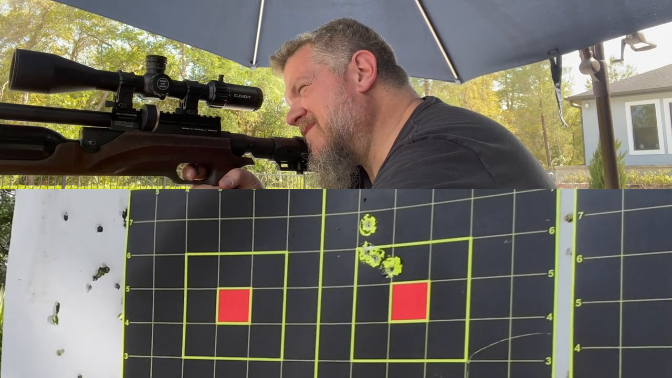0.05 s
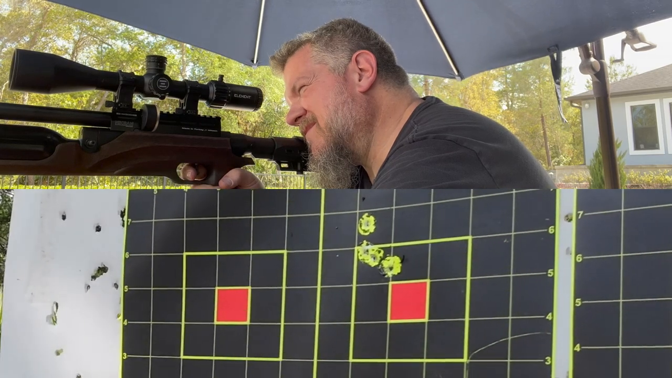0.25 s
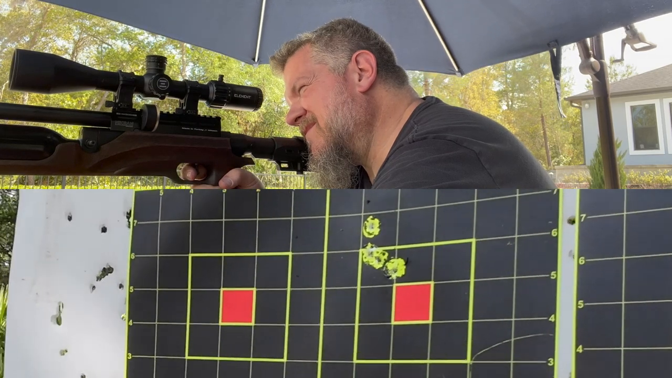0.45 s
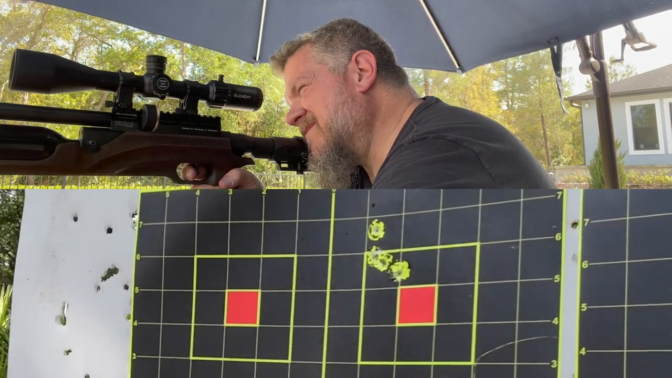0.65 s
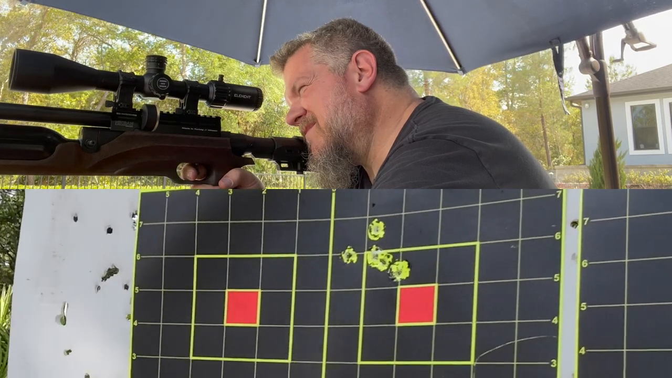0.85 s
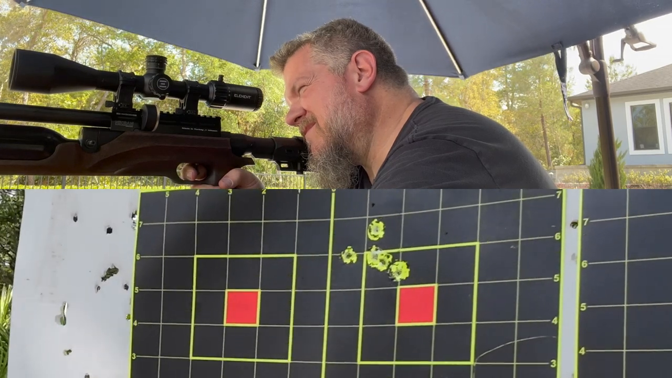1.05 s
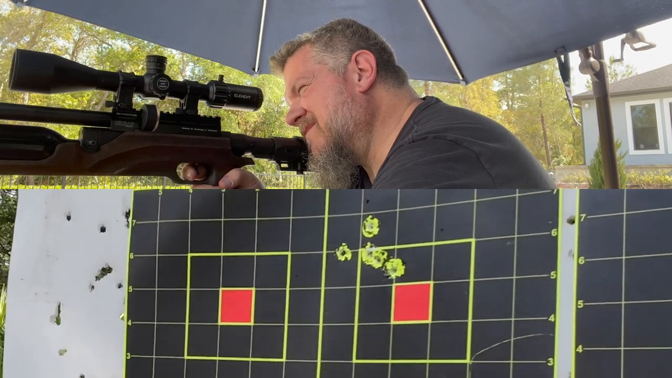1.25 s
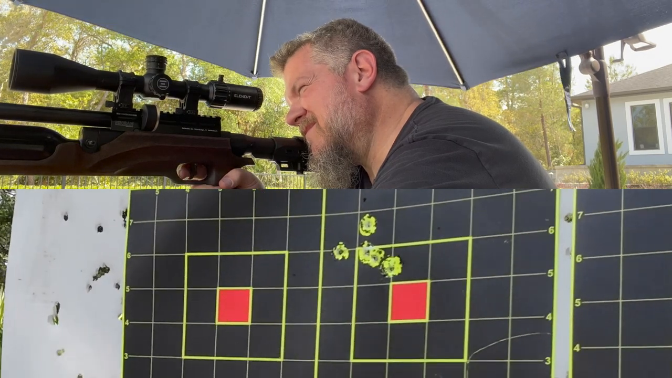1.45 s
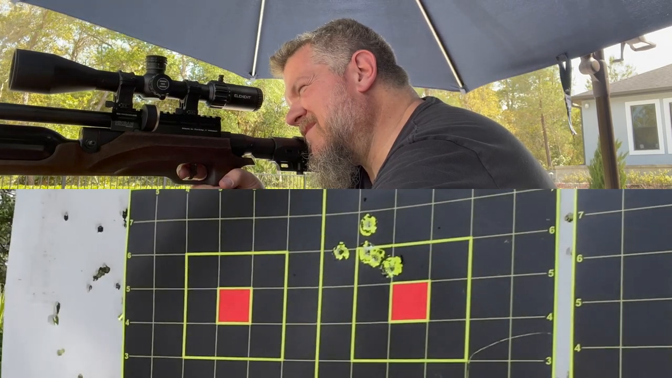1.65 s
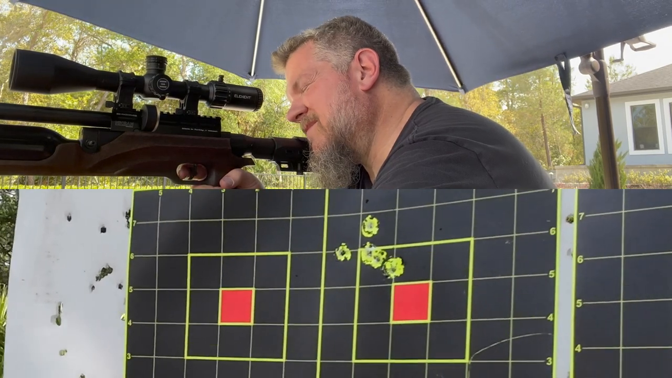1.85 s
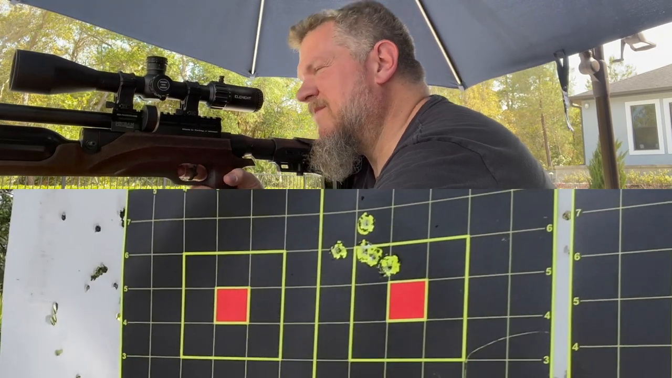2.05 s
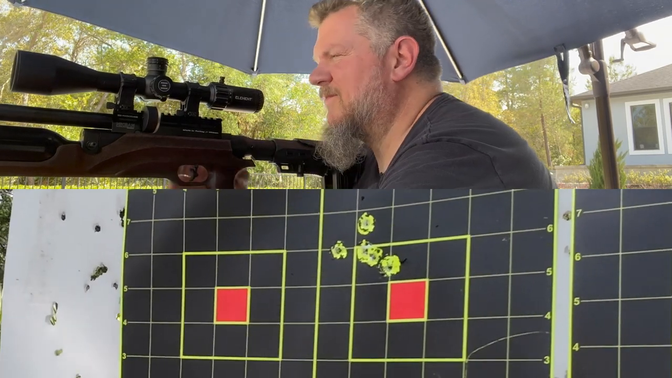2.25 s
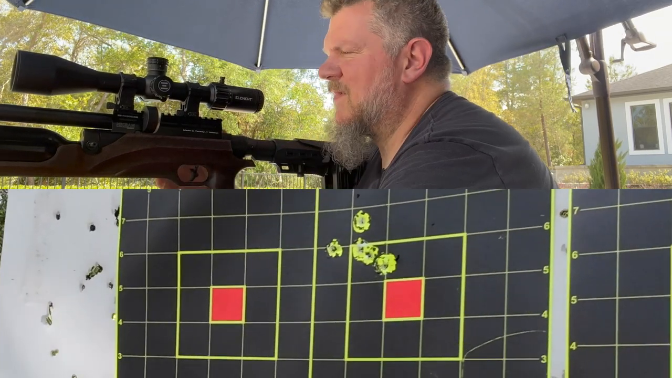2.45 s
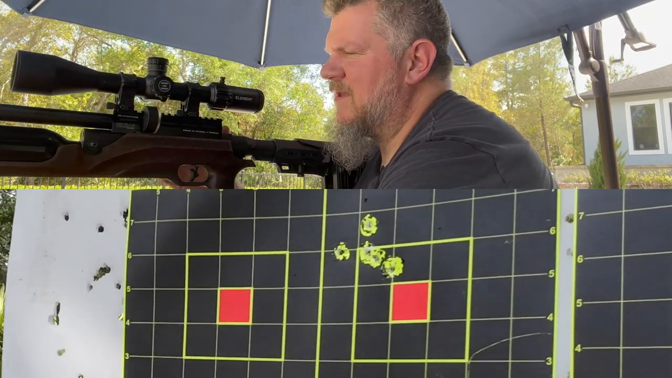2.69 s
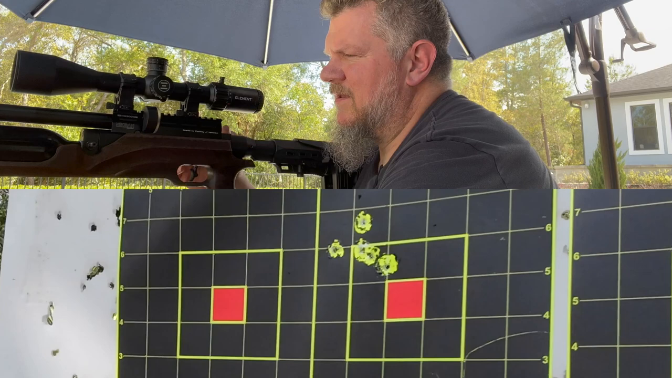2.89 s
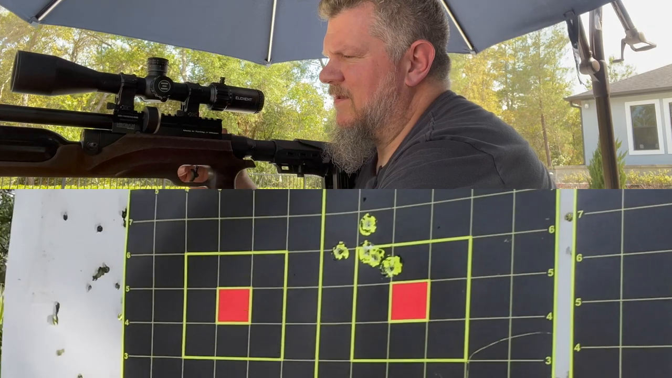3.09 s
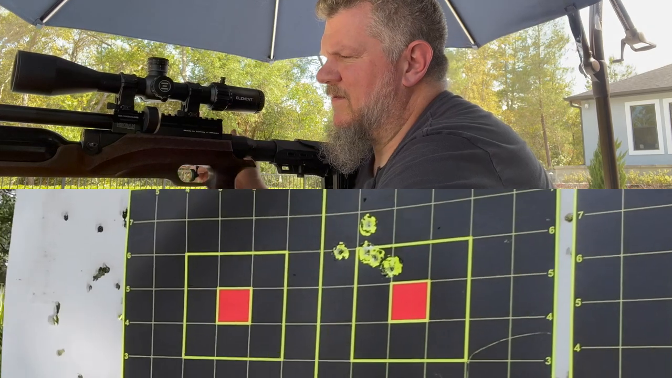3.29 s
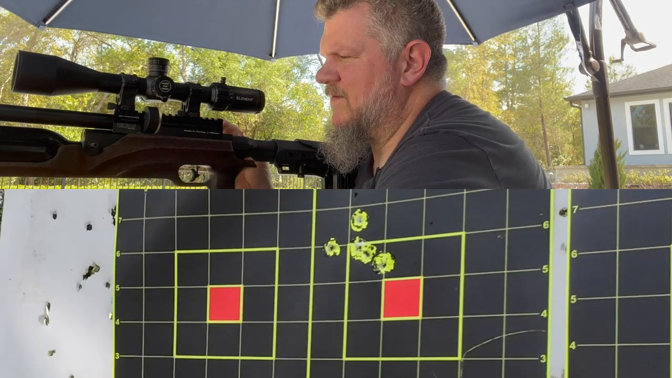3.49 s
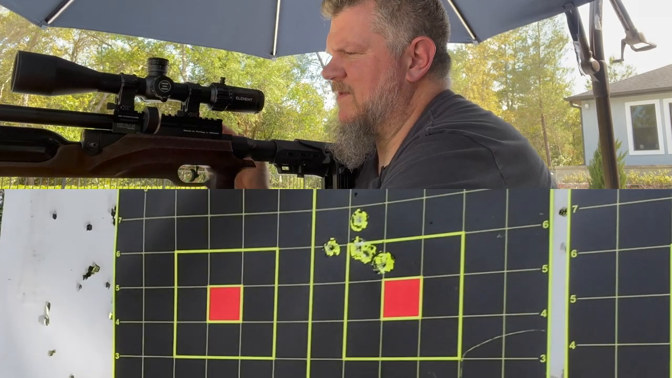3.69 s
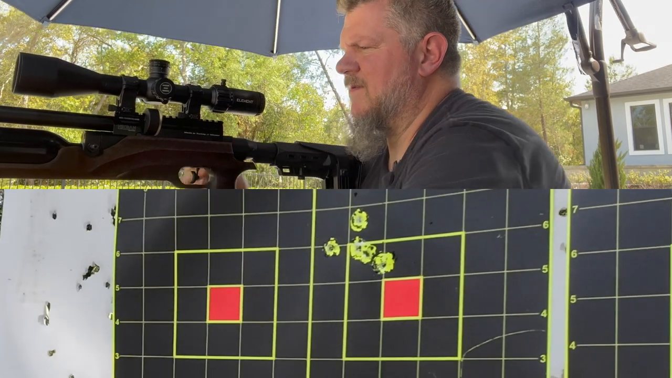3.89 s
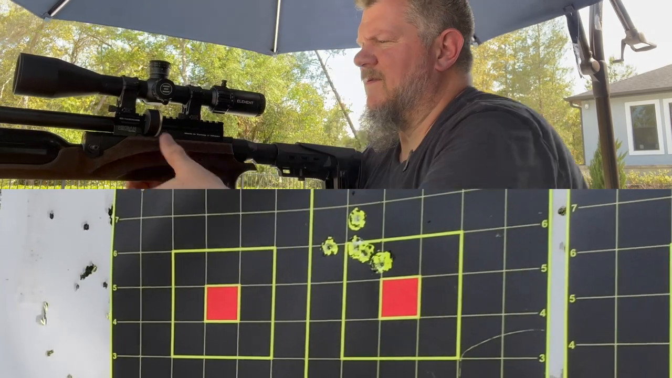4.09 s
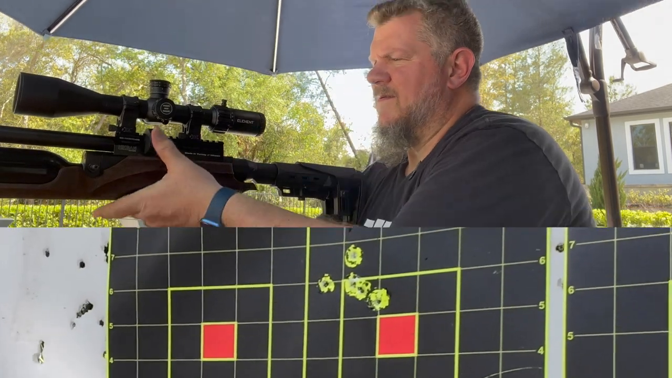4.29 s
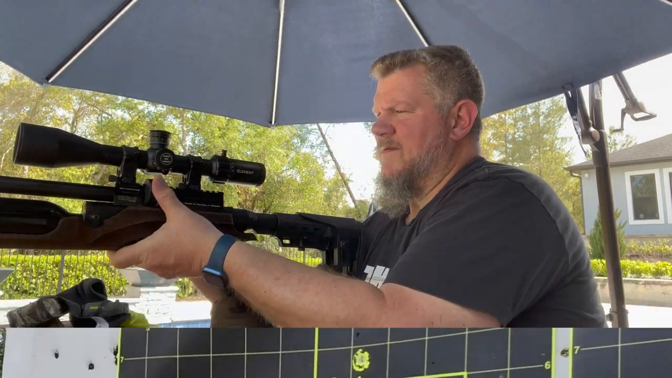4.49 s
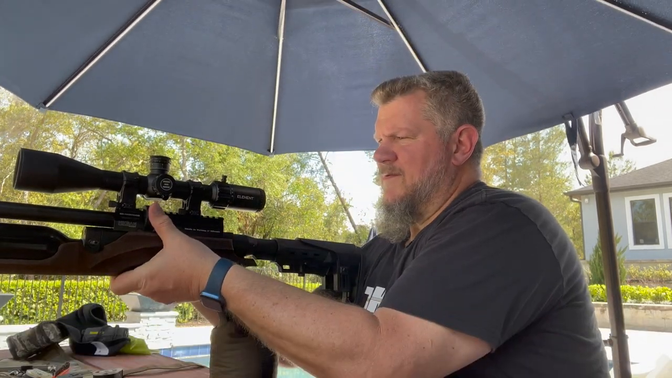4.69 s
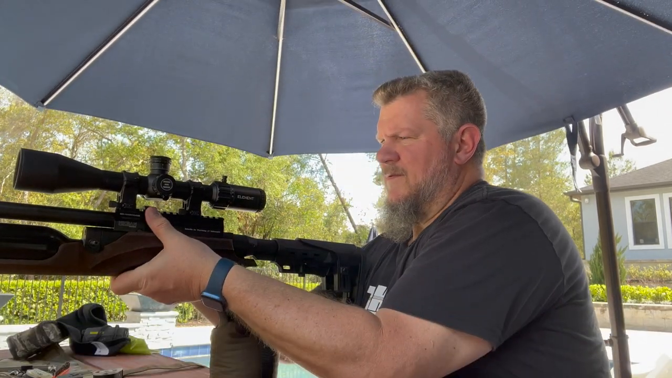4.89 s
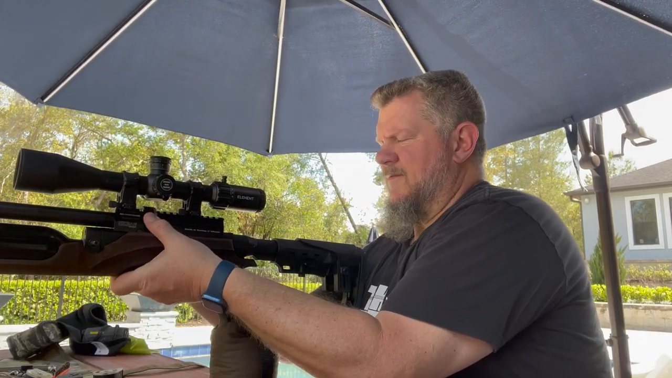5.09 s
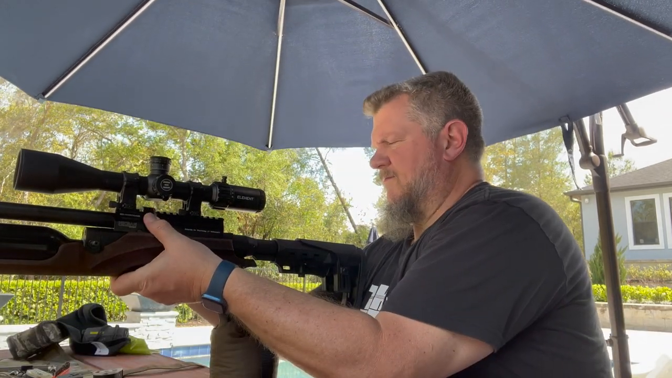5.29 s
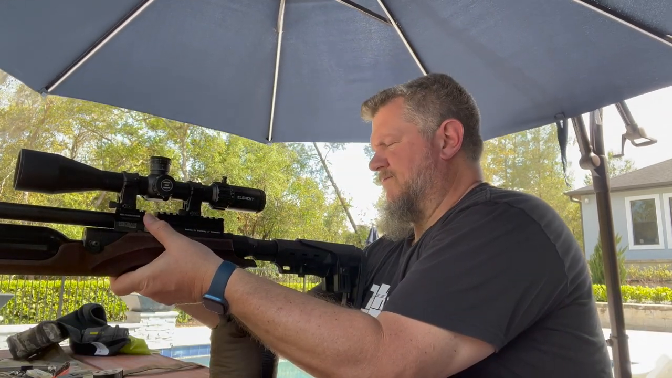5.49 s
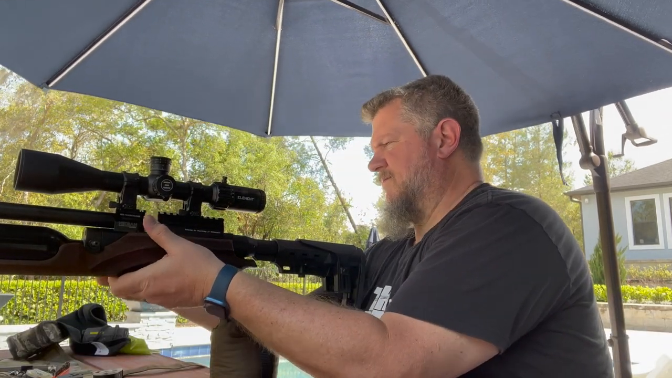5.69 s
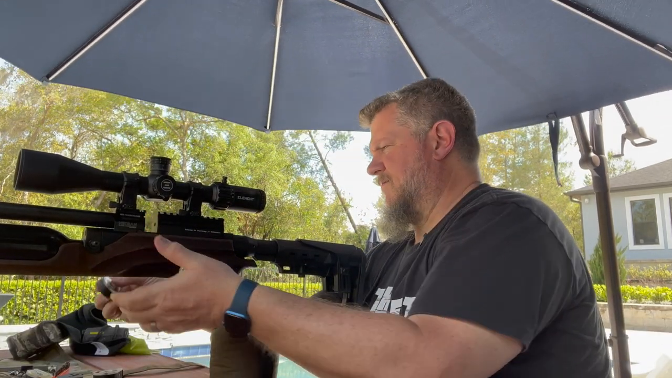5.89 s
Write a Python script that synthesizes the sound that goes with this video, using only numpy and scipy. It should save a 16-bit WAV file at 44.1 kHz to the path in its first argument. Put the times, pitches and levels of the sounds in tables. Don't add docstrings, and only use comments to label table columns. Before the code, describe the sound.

Outdoors in a garden, low breeze rumble, far traffic and a faint engine hum run throughout. At 0.8 s a tiny metallic tick leads instantly into an air rifle's loud, hissing crack, about a tenth of a second long, so close that the microphone overloads. Short echoes come off walls and trees while the air cylinder rings thinly. At 1.05 s the pellet smacks a board, crisp and bright; tiny chips tick down between 1.2 and 1.8 s. Near 2.1 s cloth or skin slides softly, then small clicks and scrapes at 2.4-2.6 s. A rattling clack comes at 2.7 s, another at 2.9 s, and firm lever snaps at 3.2-3.4 s, the last bright and ringing. Woody taps follow to 4.1 s, then a quieter gap with a faint rail slide. Rattles at 4.6 s, a sharp click at 4.9 s, light taps, and hollow knocks at 5.45, 5.74 and 5.82 s.

```python
import sys
import numpy as np
from scipy import signal
from scipy.fft import rfft, irfft, next_fast_len
from scipy.io import wavfile
from scipy.ndimage import uniform_filter1d, map_coordinates

SR = 44100
rng = np.random.default_rng(int(sys.argv[2]) if len(sys.argv) > 2 else 0)


def volts_from_decibels(level):
    exponent = np.asarray(level, float) / 20
    return 10 ** exponent


def master_out(mix):
    frames = np.transpose(np.atleast_2d(mix))
    ceiling = np.clip(frames, -1, 1)
    pcm = np.round(ceiling * 32767).astype(np.int16)
    wavfile.write(sys.argv[1], SR, pcm)


N = 262215

# start in seconds, level in dB, rise in seconds, t60 in seconds.
BLAST_STAGES = [
    (0.8078, -4.5, .0003, 0.04),
    (0.8148, -6.5, .001, 0.0049),
    (0.8177, -10, .003, 0.17),
    (0.8239, -10.5, .002, 0.029),
    (0.832, -8, 0.0022, 0.077),
    (.842, -16.5, .003, 0.063),
    (0.849, -14, .002, 0.06),
    (.864, -16.5, 0.0028, 0.02),
]
# frequency in Hz, level in dB per Hz.
JET_COLOUR = [(50, -35.5), (130, -.5), (185, 1.5), (260, -4), (400, 0), (700, -2), (1300, -6), (2200, -4.5),
              (4500, -2.5), (6500, -1.5), (8500, -9.5), (13000, -9.5), (16000, -12), (17000, -43)]
# frequency in Hz, width in Hz, level in dB.
SHROUD_MODES = [(700, 16, 3.5), (4200, 630, -5), (4900, 270, -6)]
# frequency in Hz, gain in dB.
FADING_JET_COLOUR = [(120, -12), (230, -11), (380, 3), (700, 1), (1200, -3), (1800, 3), (2800, 0),
                     (7000, 0), (10000, -4), (14000, -8)]
# start in seconds, level in dB, pitch in Hz, t60 in seconds.
HAMMER_PINGS = [
    (0.8035, -18, 4660, 0.019),
    (0.8038, -25, 899.5, .02),
    (0.8052, -24.5, 6000, .01),
    (0.815, -9, 11420, 0.008),
]
# start in seconds, level in dB, pitch in Hz, t60 in seconds.
CYLINDER_RING = (.81, -44.3, 1484, 1.98)
# start in seconds, level in dB, rise in seconds,
# t60 in seconds, pitch in Hz, width in Hz.
WHISTLE_TONES = [(.8085, -13.5, .001, .04, 6600, 500), (.8105, -14, .001, .03, 2706, 600),
                 (.819, -16.5, .002, .05, 4300, 400.7), (.823, -18, .002, .04, 12800, 2502),
                 (.824, -20, .001, .03, 9700, 600), (.829, -14, .002, .08, 4300, 600),
                 (.845, -22, .001, .03, 8910, 700), (.842, -18, .003, .07, 4700, 800),
                 (.86, -26, .002, .03, 600, 400), (.852, -23, .004, .06, 380, 200)]
# start in
# seconds, end in seconds, level in dB, centre in Hz, fade in dB.
WALL_RETURNS = [
    (0.896, .93, -42, 5800, 0),
    (.92, .96, -54, 1300, 3),
    (0.929, 0.955, -44, 5000, 0),
    (1.05, 1.2, -59, 12000, 36),
]

# frequency in Hz, t60 in seconds.
YARD_T60 = [(100, 0.16), (500, 0.3), (1200, 0.49), (3000, 0.4), (6000, 0.57), (8000, .52), (10000, .39),
            (15000, 0.22)]
# frequency in Hz, t60 in seconds.
TREES_T60 = [(200, 0.35), (1500, 1.54), (5000, 0.93), (8000, .7), (12000, 0.28)]
# frequency in Hz, t60 in seconds.
FENCE_T60 = [(500, .1), (3000, .15), (6000, .22), (10000, .38), (15000, .38)]

# time in seconds, peak in dB, centre in Hz, width in Hz.
PELLET_HITS = [
    (1.051, -13, 6360, 5040),
    (1.0524, -46, 5200, 2990),
    (1.0585, -39, 2750, 900),
]
# time in seconds, peak in dB, centre in Hz, width in Hz.
FALLING_CHIPS = [
    (1.21, -54, 2036, 504),
    (1.294, -55, 7040, 2500),
    (1.358, -62, 3500, 2480),
    (1.465, -55, 2480, 900),
    (1.4796, -49, 6100, 898),
    (1.8, -61, 9780, 3980),
]
# time in seconds, peak in dB, centre in Hz,
# width in Hz.
DRY_TICKS = [(1.051, -34, 2200, 2000), (1.051, -40, 15000, 3000), (1.4797, -57, 7600, 900),
             (1.48, -58, 3800, 1500), (1.48, -66, 13000, 1500), (2.4495, -57, 11000, 4000),
             (2.468, -62, 9000, 5000), (2.476, -46, 11400, 3000), (2.476, -51, 5300, 1500),
             (2.494, -54, 8500, 3000), (2.5545, -51, 4500, 4000), (2.5545, -62, 10500, 1500),
             (2.571, -67, 12500, 4000), (2.5795, -58, 6000, 5000), (2.625, -65, 12000, 5000),
             (2.737, -45, 13200, 2000), (3.364, -37, 12500, 3000), (3.3637, -29, 6200, 2000),
             (3.5715, -55, 6500, 5000), (4.804, -58, 9000, 8000), (4.8868, -25, 13000, 6000),
             (4.8875, -38, 9000, 3000), (5.455, -45, 7400, 2000), (5.455, -41, 5300, 1500),
             (1.051, -19, 9500, 3000), (3.2205, -45, 5500, 4000), (3.2785, -57, 11500, 2000),
             (4.405, -66, 5300, 2000), (4.38, -70, 4400, 1200), (5.461, -58, 12000, 5000),
             (5.537, -53, 6500, 4000), (5.744, -53, 11200, 1500), (5.7445, -44, 5000, 7000),
             (5.7402, -39, 3800, 3000), (5.822, -56, 6500, 5000)]

# time in seconds, peak in dB, pitch in Hz, bright tick in dB.
STEEL_CLICKS = [(2.433, -58.5, 2850, -7), (3.121, -57.5, 1590, -19.5), (5.216, -66, 2530, -20),
                (2.449, -61, 2760, 0), (2.478, -62, 3820, 3), (2.493, -61, 3800, -3),
                (2.8375, -49.5, 1900, -36), (3.4047, -25.5, 3800, -5), (4.875, -53.5, 1700, -7),
                (5.0467, -64.5, 3300, -22), (5.0587, -57, 1440, -20), (5.169, -56, 1880, -10),
                (5.4107, -46.5, 1846, -30)]
# time in seconds, peak in dB, pitch in Hz, bright tick in dB.
STOCK_TAPS = [(2.1799, -52, 3600, -4), (2.2258, -45, 1700, -19), (2.5786, -63.5, 1630, -20.5),
              (3.026, -58.5, 2865, -2), (3.2196, -39.5, 2020, -12), (3.4844, -55, 2020, -9),
              (3.4945, -39.5, 1990, -16), (3.5705, -45, 1680, -24), (3.611, -55, 3500, -12),
              (3.746, -43.5, 1900, -29), (3.8214, -45, 1500, -13), (3.9905, -50, 1520, -16),
              (4.0286, -59, 1536, -23.5), (4.1103, -68, 1560, -11), (4.404, -75, 2350, -17),
              (5.0085, -57, 1720, -6), (5.1016, -60, 1290, -25.5), (5.1846, -64, 1890, -23),
              (5.3634, -51, 1910, -31.5), (5.5363, -52, 1280, -18)]
# time in seconds, peak in dB, pitch in Hz, bright tick in dB.
STOCK_KNOCKS = [(2.5534, -52, 4230, -22), (3.8596, -39.5, 1940, -17), (5.7385, -41.5, 1900, -10),
                (5.816, -46, 1100, -14)]
# time in seconds, peak in dB, pitch in Hz, bright tick in dB.
LOOSE_RATTLES = [(2.7332, -30.5, 4100, -22), (2.9272, -36, 4000, -12), (4.6113, -43, 2246, -2),
                 (4.6278, -44.5, 2560, -12), (4.8, -48.5, 1600, -5), (4.9689, -49.5, 1660, 0),
                 (5.1581, -53.5, 1830, -6.5), (5.4283, -46, 1150, -36), (5.4521, -43, 1600, -24)]
# time in seconds, peak in dB, pitch in Hz, bright tick in dB.
LEVER_LATCHES = [(2.735, -32, 4750, -13), (3.2777, -35, 3800, -34), (3.3636, -33, 2190, -28),
                 (3.366, -34, 3950, -30), (4.8865, -35.5, 3300, -0.5)]
# frequency in Hz, width in Hz, level in dB.
ACTION_MODES = [(1440, 340, 1.5), (2270, 1650, -3), (2750, 170, 4.5), (3500, 3400, -3.5), (4200, 910, 5.5),
                (4900, 1600, 0), (6370, 250, -46)]
# frequency in Hz, width in Hz, level in dB.
STOCK_MODES = [(405, 360, -6.5), (758, 203, 6), (1155, 260, 2.5)]
# start in
# seconds, level in dB, pitch in Hz, t60 in seconds.
CONTACT_RINGS = [(2.738, -61, 4200, 0.12), (3.2773, -26, 4130, 0.018), (3.366, -20.5, 4150, 0.017),
                 (2.7355, -24, 4900, 0.018), (2.7305, -46, 3900, .03), (2.7372, -35, 2500, .016),
                 (2.7368, -32, 1600, .02), (3.359, -42, 1800, .03), (3.363, -27, 2050, 0.016),
                 (3.3639, -31, 1290, .015), (3.4045, -27, 10840, .011), (3.405, -27.5, 7600, .014),
                 (3.406, -31, 1950, .018), (3.4055, -40, 15300, .01), (3.405, -34, 4900, .015),
                 (3.407, -60, 8630, .1), (3.4045, -36, 12300, .012), (3.405, -51, 5860, 0.13),
                 (3.406, -53, 3810, 0.054), (3.406, -58, 2750, .15), (4.801, -47, 1550, 0.04),
                 (4.886, -43, 1600, .03), (4.887, -50, 1200, .08), (5.159, -57, 1200, .08),
                 (5.058, -39, 1350, 0.016), (5.4512, -33, 1616, 0.035),
                 (2.227, -55, 2500, .03), (2.838, -54, 4000, .02), (2.554, -56, 4250, .025),
              (2.554, -60, 1450, .03), (3.279, -44, 1500, .025), (2.93, -60, 3000, .1),
              (3.572, -54, 2000, .03), (3.746, -50, 4900, .02), (3.747, -46, 2300, .03),
              (3.76, -52, 750, .06), (3.861, -42, 1100, .035), (3.861, -46, 1840, .035),
              (3.861, -50, 5200, .02), (3.99, -56, 5200, .025), (3.991, -54, 1500, .04),
              (4.613, -50, 4840, .03), (4.969, -55, 3600, .03), (4.974, -56, 2750, .04),
              (4.972, -55, 1650, .04), (5.047, -62, 3300, .025), (5.06, -57, 2750, .03),
              (5.16, -58, 3300, .03), (5.168, -55, 2800, .035), (5.183, -57, 2750, .04),
              (5.183, -58, 1880, .04), (5.364, -52, 2500, .03), (5.371, -54, 1050, .04),
              (5.412, -54, 2900, .03), (5.453, -42, 2460, .028), (5.454, -40, 1290, .05),
              (5.739, -49, 790, .13), (5.74, -50, 1810, .08), (5.817, -44, 800, .06),
              (5.829, -48, 760, .12), (5.826, -60, 1760, .05)]
# start in seconds,
# level in dB, pitch in Hz, t60 in seconds.
LOW_THUMPS = [(.812, -26.5, 184, .1), (2.24, -53, 44, .58), (2.928, -49, 330, .05), (3.86, -60, 44.7, .3),
              (3.861, -50, 280, .08), (3.862, -50, 500, .08), (3.988, -48, 350, .07),
              (4.612, -40, 55.3, .17), (4.627, -46, 354, .06), (4.886, -45, 60, .14),
              (5.66, -51.5, 35.8, .35), (5.738, -50, 503, .14), (5.741, -45, 277, .13),
              (5.818, -47, 290, .07), (5.453, -50, 420, .08)]

# start in seconds, end in seconds, scrape in dB, centre in Hz, rustle in dB.
RAIL_STROKES = [(2.32, 2.44, -75, 3200, -108), (2.42, 2.565, -66, 2720, -79), (2.43, 2.56, -65, 3850, -85),
                (2.425, 2.53, -68, 3400, -99), (2.555, 2.61, -72, 1400, -99),
                (2.865, 2.938, -69, 3800, -99), (2.88, 2.935, -73, 4800, -99),
                (4.306, 4.388, -70, 2750, -88), (4.312, 4.386, -77, 1900, -99),
                (4.312, 4.375, -77, 3400, -99), (4.315, 4.375, -81, 7200, -99)]
# start in seconds, end in
# seconds, scrape in dB, centre in Hz, rustle in dB.
STEEL_SQUEAKS = [(2.703, 2.735, -64.5, 1730, -78), (1.36, 2.101, -84.5, 4420, -99),
                 (2.72, 2.81, -72, 4200, -76), (2.868, 2.93, -69, 1980, -95), (4.89, 4.935, -67, 2700, -93),
                 (4.895, 4.925, -66, 1780, -95.5), (3.274, 3.37, -65, 1700, -99),
                 (3.28, 3.35, -68, 4000, -99), (2.435, 2.52, -71.5, 9900, -99),
                 (3.34, 3.362, -64, 4300, -99), (3.39, 3.405, -62, 1820, -76),
                 (4.62, 4.672, -75, 11500, -99), (5.41, 5.45, -75, 8800, -99),
                 (5.48, 5.505, -76, 5100, -85)]
# start in
# seconds, end in seconds, scrape in dB, centre in Hz, rustle in dB.
BROAD_SLIDES = [(1.58, 1.991, -92, 7770, -94), (2.695, 2.715, -66.5, 4770, -100),
                (2.876, 2.939, -65, 1600, -88), (2.045, 2.2, -73, 7000, -70), (2.075, 2.15, -63, 3300, -95),
                (2.09, 2.135, -65, 1300, -95), (2.845, 2.88, -67, 2900, -95),
                (2.554, 2.644, -73.5, 4000, -83), (3.107, 3.18, -75.5, 3990, -99),
                (3.28, 3.416, -64, 2280, -80), (3.754, 3.925, -67, 1880, -76),
                (3.805, 3.85, -71, 8000, -95), (3.61, 3.632, -71, 4000, -90), (5.74, 5.79, -67, 4200, -90),
                (4.631, 4.678, -61.5, 1700, -84), (5.405, 5.458, -60, 1500, -76)]
# start in seconds, end in seconds, scrape in dB, centre in Hz, rustle in dB.
SETTLING_PARTS = [(3.224, 3.265, -55, 1100, -83), (3.407, 3.452, -55, 4130, -52),
                  (3.491, 3.549, -54.5, 910, -85), (3.749, 3.789, -55, 1300, -80),
                  (3.86, 3.923, -52, 799, -80), (4.892, 4.955, -67, 2590, -78),
                  (5.442, 5.518, -53, 750, -69), (5.738, 5.811, -50.5, 800, -72),
                  (5.817, 5.876, -54.5, 780, -80)]
# frequency in Hz, level in dB per Hz.
RUSTLE_COLOUR = [(3000, -33), (5500, -3), (9000, -6.5), (13000, -16.5), (14500, -18), (15400, -44)]
# frequency in Hz, level in dB per Hz.
LEAVES_COLOUR = [(800, -26), (1500, 1.5), (3000, -5), (4400, -3.5), (6000, -14), (9000, -22)]
# time in seconds, level in dB.
STIR_LEVEL = [(1.2, -80), (1.5, -82.5), (2.65, -72), (2.96, -85), (3.31, -70), (3.5, -79.5), (3.95, -76),
              (4.2, -82), (5.37, -80.5), (5.6, -74.5), (5.95, -82.5)]

# frequency in Hz, level in dB per Hz.
AIR_COLOUR = [(59, -39), (100, -3), (119, -6.5), (160, -3), (279, -10.5), (317, -9.5), (368, -7.5),
              (437, -6), (655, -15.5), (699, -11.5), (1000, -13), (1180, -24), (2500, -33), (9270, -45),
              (14300, -54), (14900, -80)]
# frequency in Hz, level in dB per Hz.
RUMBLE_COLOUR = [(8, -58), (20, -7.5), (33, 0), (55, -4), (90, -7.5), (140, -41.5), (200, -61)]
# time in seconds, level in dB.
BREEZE_LEVEL = [(0.0, -75), (0.48, -73), (0.76, -72.5), (1.15, -72), (1.36, -74), (1.87, -74),
                (2.35, -66.5), (2.56, -68), (2.86, -67), (4.1, -71), (4.38, -75), (4.92, -67), (5.05, -70),
                (5.29, -72), (5.94, -67)]
# time in seconds, level in dB.
ENGINE_LEVEL = [(0.0, -66), (0.492, -64.5), (0.76, -65), (1.15, -65.5), (1.5, -62.5), (2.07, -78.5),
                (2.42, -74), (2.51, -76.5), (4.06, -74), (4.92, -68.5), (5.29, -72), (5.94, -70.5)]
# closest time in seconds, half-length in seconds, wash swell in dB, drone swell in dB.
VEHICLE_PASSES = [
    (1.6, .5, 0.75, 5.5),
    (2.3, .3, 2, 4),
    (3.874, 0.2, 5.5, 2.1),
    (5.652, .3, 1, 6.5),
]

# rise in seconds, cycles of chatter until -60 dB, wooden knock in dB.
CLICK = (0.00021, 56, -12)
TAP = (0.00018, 85, -5.5)
KNOCK = (0.00032, 80, 2.34)
RATTLE = (.002, 55, -11)
LATCH = (.0007, 54, -25.5)


def unit(x):
    return x / np.sqrt(np.mean(x ** 2) + 1e-20)


def top(x):
    return x / np.abs(x).max()


def along(points, hz):
    f, v = np.transpose(points)
    return np.interp(np.log(hz + 1), np.log(f + 1), v)


def curve(rows):
    s, level = np.transpose(rows)
    return np.interp(np.arange(N) / SR, s, level, left=-120)


def wobble(rate):
    knots = rng.standard_normal(int(N * rate / SR) + 4)
    return map_coordinates(knots, [np.arange(N) * rate / SR])


def filtered(x, response):
    m = next_fast_len(len(x) + 8192)
    return irfft(rfft(x, m) * response(np.fft.rfftfreq(m, 1 / SR)), m)[:len(x)]


def resonances(modes):
    def response(f):
        total = 0
        for k, (hz, width, db) in enumerate(modes):
            total = total + (-1) ** k * volts_from_decibels(db) * 1j * f * width / (hz * hz - f * f + 1j * f * width)
        return total
    return response


def noise(spectrum):
    return unit(filtered(rng.standard_normal(N), lambda hz: volts_from_decibels(along(spectrum, hz))))


def decay(s, db, rise, t60):
    t = np.maximum(np.arange(N) / SR - s, 0)
    return volts_from_decibels(db - 60 * t / t60) * (1 - np.exp(-t / rise))


def ping(s, db, hz, t60, rough=0):
    out = np.zeros(N + 2 * SR)
    t = np.arange(2 * SR if t60 > .25 else SR // 2) / SR
    tone = np.sin(2 * np.pi * hz * t)
    if rough:
        tone += rough * rng.standard_normal(len(t))
    onset = (1 - np.exp(-t * hz / .8)) ** 2
    out[round(s * SR):][:len(t)] = volts_from_decibels(db - 60 * t / t60) * onset * tone
    return out[:N]


def shot():
    surges = np.sqrt(sum(decay(*stage) ** 2 for stage in BLAST_STAGES))
    shroud = resonances(SHROUD_MODES)
    jet = unit(filtered(noise(JET_COLOUR), lambda hz: 1 + 1.2 * np.abs(shroud(hz))))
    late = 1 / (1 + np.exp(np.clip((.845 - np.arange(N) / SR) / .004, -50, 50)))
    jet = (1 - late) * jet + late * filtered(jet, lambda hz: volts_from_decibels(along(FADING_JET_COLOUR, hz)))
    hammer = sum(ping(*hit, rough=.5) for hit in HAMMER_PINGS)
    return jet * surges + hammer + ping(*CYLINDER_RING), distant_pop(surges)


def distant_pop(surges):
    impulse = 1. * (np.arange(N) == round(BLAST_STAGES[4][0] * SR))
    pop = filtered(impulse, lambda hz: volts_from_decibels(along(JET_COLOUR, hz)))
    return pop * np.linalg.norm(surges) / np.linalg.norm(pop)


def whistles():
    air, out = rng.standard_normal(N), np.zeros(N)
    for s, db, rise, t60, hz, width_hz in WHISTLE_TONES:
        edge = resonances([(hz, width_hz, 0)])
        out += decay(s, db, rise, t60) * unit(filtered(air, lambda f: edge(f) ** 2))
    return out


def snaps(hits, dull_hz):
    out, t = np.zeros(N), np.arange(SR // 20) / SR
    for s, db, hz, width_hz in hits:
        snap = (t == 0) + 0.095 * rng.standard_normal(len(t)) * volts_from_decibels(-60 * t / 0.012)
        body = resonances([(hz, width_hz, 0)])
        snap = filtered(snap, lambda f: body(f) ** 2 / (1 + 1j * f / dull_hz) ** 3)
        out[round(s * SR):][:len(t)] += volts_from_decibels(db) * top(snap)
    return out


def contact(kind, db, hz, tick_db):
    rise, cycles, wood_db = kind
    t = np.arange(SR // 5) / SR
    fall = volts_from_decibels(-60 * t * hz / cycles) + volts_from_decibels(-31.5 - 60 * t / 0.12)
    burst = rng.standard_normal((3, len(t))) * fall * (1 - np.exp(-t / rise)) ** 2
    near = [(f, w, level + rng.normal(0, 3) - 6 * abs(np.log2(f / hz))) for f, w, level in ACTION_MODES]
    clack = filtered(burst[0], resonances([(hz, 0.092 * hz, 5)] + near))
    clack = filtered(clack, lambda f: 1 / (1 + 1j * f / 6500) ** 3)
    tick_edge = signal.butter(3, [4800, 12500], "band", fs=SR, output="sos")
    tick = signal.sosfilt(tick_edge, burst[1] * volts_from_decibels(-60 * t / 0.033))
    knock = filtered(burst[2], resonances(STOCK_MODES))
    knock = filtered(knock, lambda f: 1 / (1 + 1j * f / 1500))
    knock_db = wood_db - 2 * np.log2(hz / 2000)
    return volts_from_decibels(db) * (top(clack) + volts_from_decibels(tick_db) * top(tick) + volts_from_decibels(knock_db) * top(knock))


def handling():
    out = np.zeros(N + SR)
    kinds = [(CLICK, STEEL_CLICKS), (TAP, STOCK_TAPS), (KNOCK, STOCK_KNOCKS),
             (RATTLE, LOOSE_RATTLES), (LATCH, LEVER_LATCHES)]
    for kind, contacts in kinds:
        for s, *sound in contacts:
            hit = contact(kind, *sound)
            out[round((s - kind[0] / 2) * SR):][:len(hit)] += hit
    return out[:N]


def rubbing():
    stir_db, rustle = curve(STIR_LEVEL), noise(RUSTLE_COLOUR)
    fade_in = np.clip((np.arange(N) / SR - STIR_LEVEL[0][0]) / 0.59, 0, 1)
    fabric = volts_from_decibels(-86.5 + 0.15 * (stir_db + 80)) * fade_in
    out = volts_from_decibels(stir_db) * noise(LEAVES_COLOUR) + fabric * rustle
    grit = rng.standard_normal(N) * volts_from_decibels(1.7 * wobble(81))
    lumps = volts_from_decibels(1.7 * wobble(55))
    kinds = [(.09, 0, RAIL_STROKES), (0.17, 0, STEEL_SQUEAKS), (0.91, 0, BROAD_SLIDES), (0.91, 17.5, SETTLING_PARTS)]
    for share, fade_db, strokes in kinds:
        for start, end, scrape_db, hz, rustle_db in strokes:
            span = slice(round(start * SR), round(end * SR))
            track = resonances([(hz, share * hz, 0)])
            scrape = unit(filtered(grit[span], lambda f: track(f) ** 2))
            stroke = signal.windows.tukey(len(scrape), .3 if fade_db else .85) * lumps[span]
            stroke *= volts_from_decibels(np.linspace(0, -fade_db, len(scrape)))
            out[span] += stroke * (volts_from_decibels(scrape_db) * scrape + volts_from_decibels(rustle_db) * rustle[span])
    return out


def walls():
    out = np.zeros(N)
    for start, end, db, hz, fade_db in WALL_RETURNS:
        span = slice(round(start * SR), round(end * SR))
        surface = resonances([(hz, .7 * hz, 0)])
        hiss = unit(filtered(rng.standard_normal(span.stop - span.start), lambda f: surface(f) ** 3))
        gain = volts_from_decibels(db - np.linspace(0, fade_db, len(hiss)))
        out[span] += gain * hiss * signal.windows.tukey(len(hiss), .3)
    return out


def echo(x, t60s, gap):
    hz, t, z = signal.stft(rng.standard_normal(2 * SR), SR, nperseg=256)
    tail = signal.istft(z * volts_from_decibels(-60 * t / along(t60s, hz)[:, None]), SR, nperseg=256)[1]
    return signal.fftconvolve(np.pad(x, (int(gap * SR), 0)), tail / np.linalg.norm(tail))[:N]


def patchy(x, depth_db):
    z = signal.stft(x, nperseg=256)[2]
    field = uniform_filter1d(rng.standard_normal(z.shape), size=9, axis=0)
    field = uniform_filter1d(field, size=5, axis=1)
    return signal.istft(z * volts_from_decibels(depth_db * unit(field)), nperseg=256)[1][:N]


def garden():
    t = np.arange(N) / SR
    wash_db, drone_db = -71 + .8 * wobble(9), -74.5
    for s, half, wash_swell_db, drone_swell_db in VEHICLE_PASSES:
        nearness = 1 / (1 + ((t - s) / half) ** 2)
        wash_db = wash_db + wash_swell_db * nearness
        drone_db = drone_db + drone_swell_db * nearness
    air = noise(AIR_COLOUR)
    drone = filtered(air, lambda hz: 1 / (1 + (hz / 290) ** 6))
    traffic = volts_from_decibels(wash_db) * unit(air - drone) + volts_from_decibels(drone_db) * unit(drone)
    firing = np.sin(2 * np.pi * np.cumsum(76.3 + 1.8 * wobble(2)) / SR)
    blur = noise([(50, -50.5), (66, -3.5), (76, -2.5), (88, -3.0), (115, -48.5)])
    hum = unit(0.71 * blur + firing)
    rumble = noise(RUMBLE_COLOUR) * volts_from_decibels(0.67 * wobble(5.4))
    return volts_from_decibels(curve(BREEZE_LEVEL) + 3.0) * rumble + traffic + volts_from_decibels(curve(ENGINE_LEVEL) + 1.0) * hum


def scene():
    report, blast = shot()
    hands = handling()
    target, chips = snaps(PELLET_HITS, dull_hz=6500), snaps(FALLING_CHIPS, dull_hz=8000)
    ticks = snaps(DRY_TICKS, dull_hz=30000)
    rings = sum(ping(*part) for part in CONTACT_RINGS)
    bench = sum(ping(*bump) for bump in LOW_THUMPS)
    echoes = volts_from_decibels(-19.0) * echo(blast, YARD_T60, .025)
    echoes += volts_from_decibels(-30.5) * echo(blast, TREES_T60, 0.07)
    echoes += volts_from_decibels(-31.0) * echo(hands, YARD_T60, 0.035)
    echoes += volts_from_decibels(-9.5) * echo(target, FENCE_T60, 0.00047)
    near = report + whistles() + target + chips + ticks + hands + rings + rubbing() + bench
    return (near + walls() + patchy(echoes, depth_db=1.3) + garden())[None]


def low_pass(x):
    return signal.sosfilt(signal.butter(12, 16650, fs=SR, output="sos"), x)


def record(dry):
    since = np.maximum(np.arange(N) / SR - .808, 0)
    swing = -decay(.808, -17, .003, .27) * np.sin(np.pi * np.log2(1 + since / .019))
    pushed = dry[0] + 1.1 * swing
    clipped = pushed / (1 + np.abs(pushed / .41) ** 6) ** (1 / 6)
    clipped += .14 * swing
    band = signal.cheby2(12, 50, 16400, fs=SR, output="sos")
    mix = signal.sosfilt(band, clipped)[None]
    return low_pass(mix)


dry = scene()
out = record(dry)
master_out(out)
```